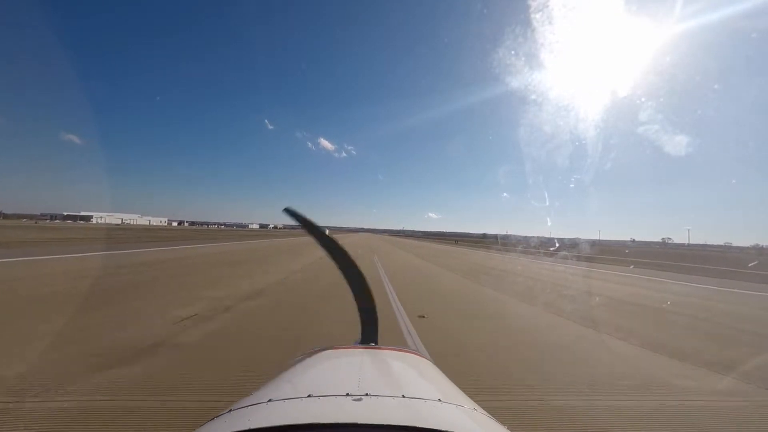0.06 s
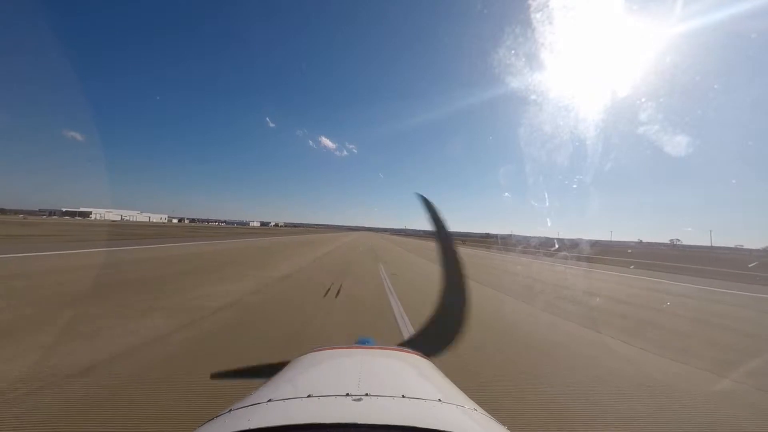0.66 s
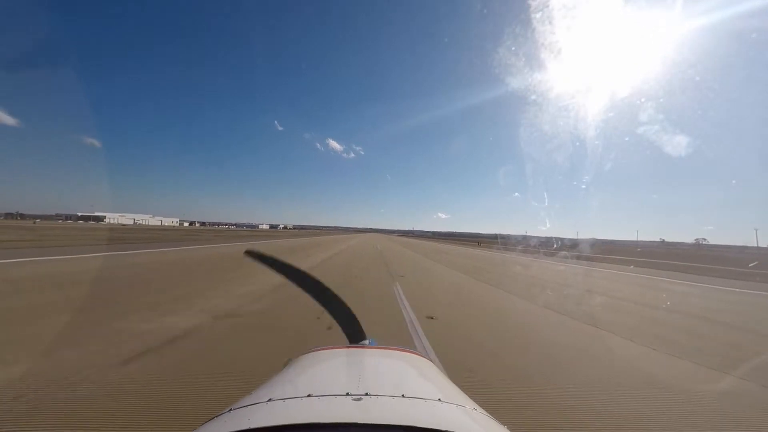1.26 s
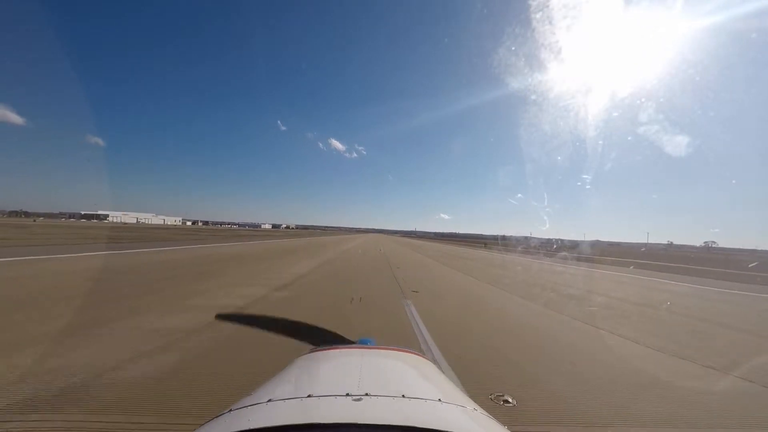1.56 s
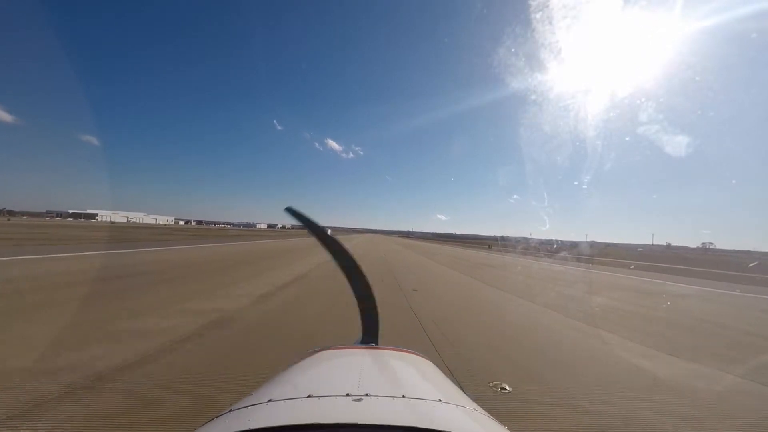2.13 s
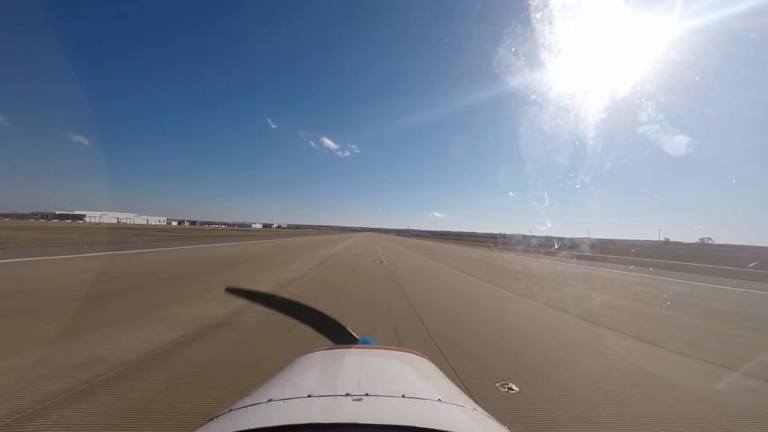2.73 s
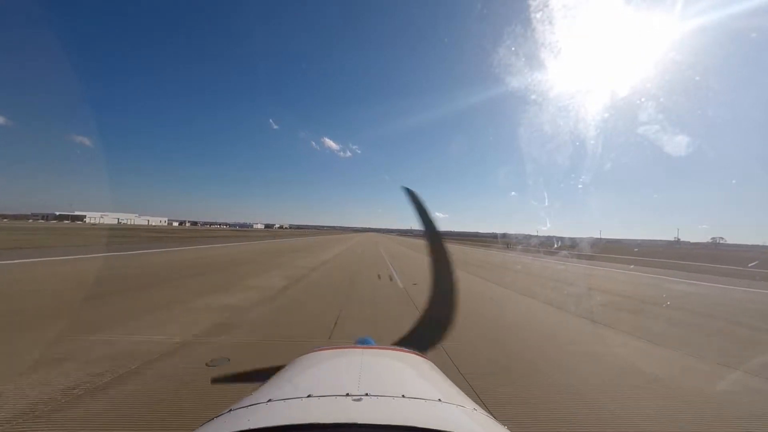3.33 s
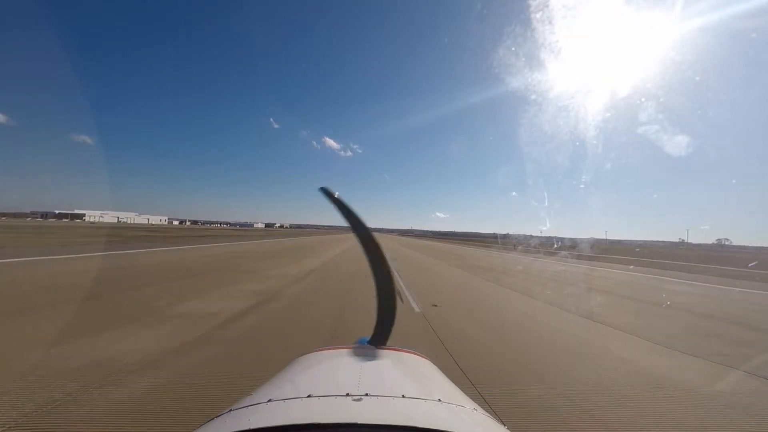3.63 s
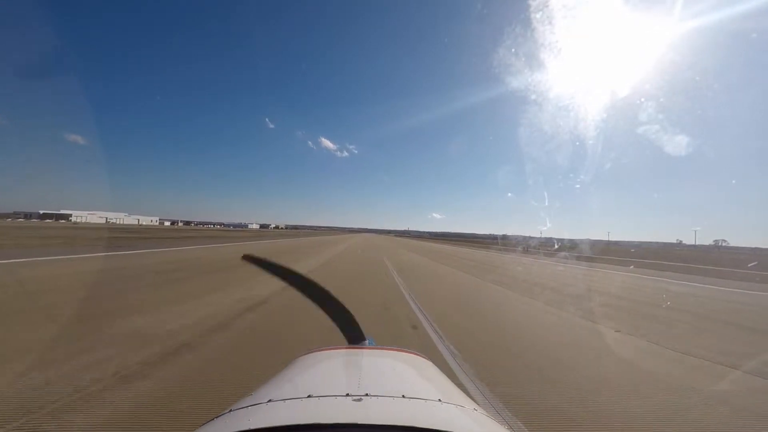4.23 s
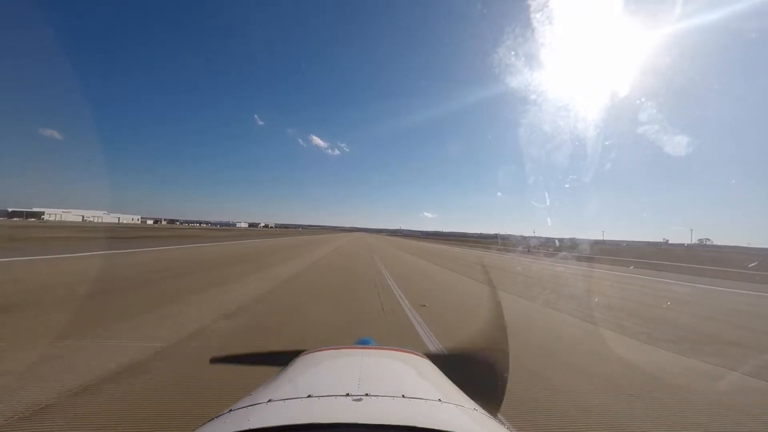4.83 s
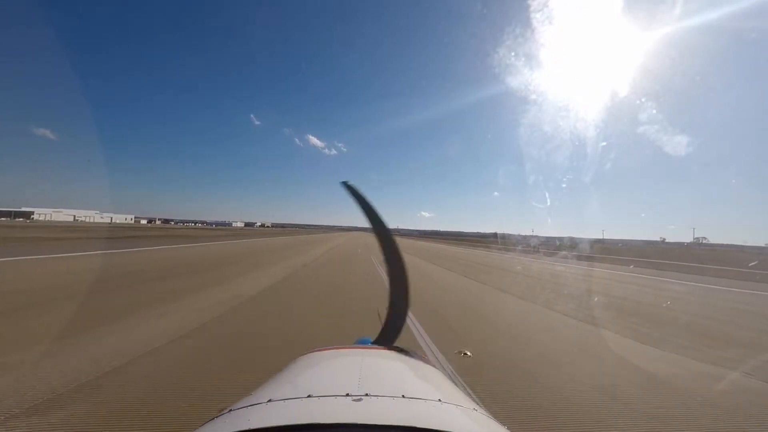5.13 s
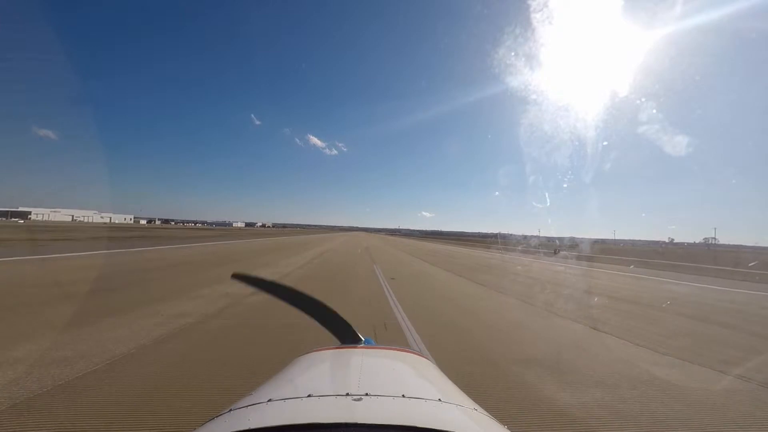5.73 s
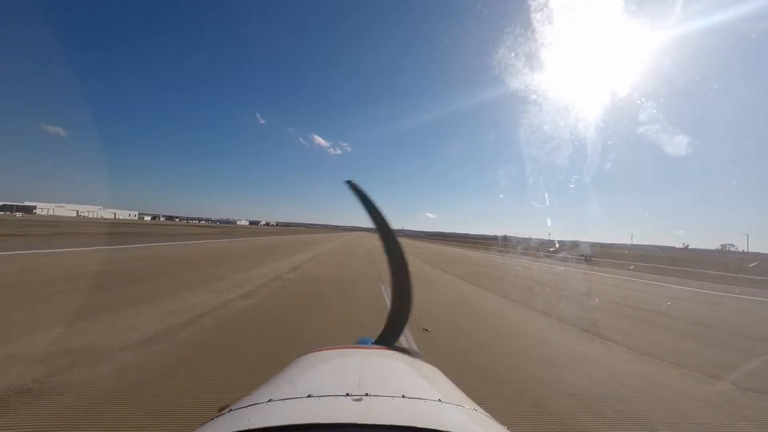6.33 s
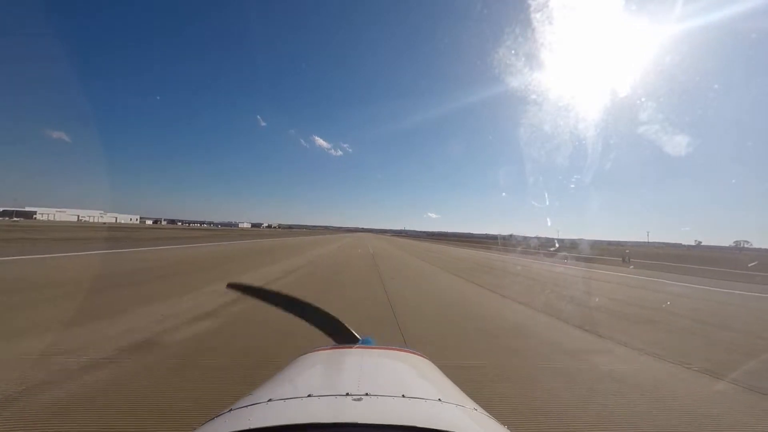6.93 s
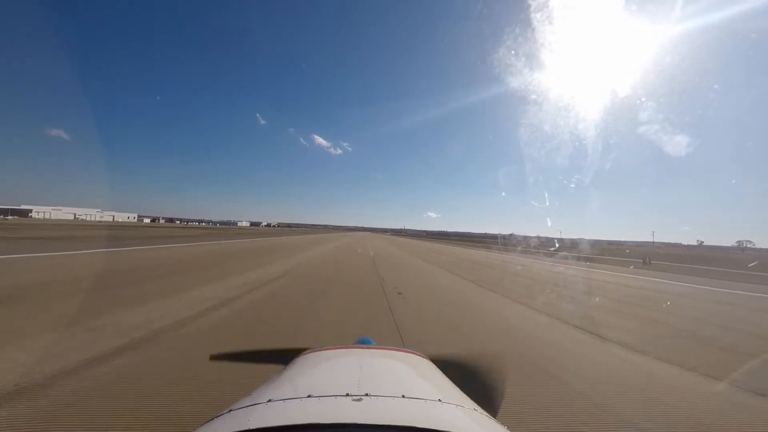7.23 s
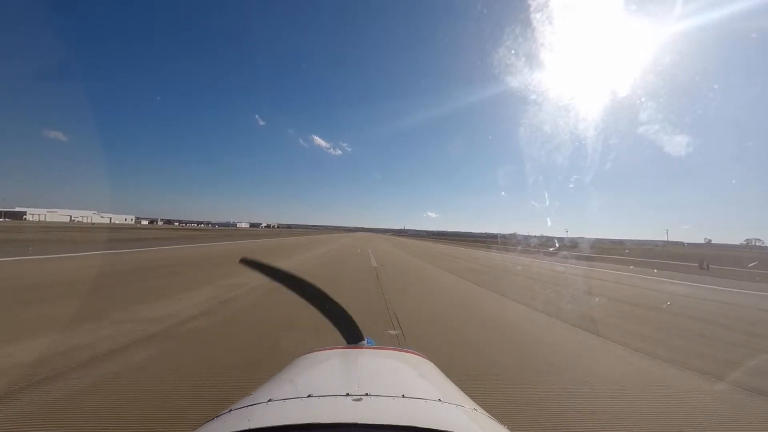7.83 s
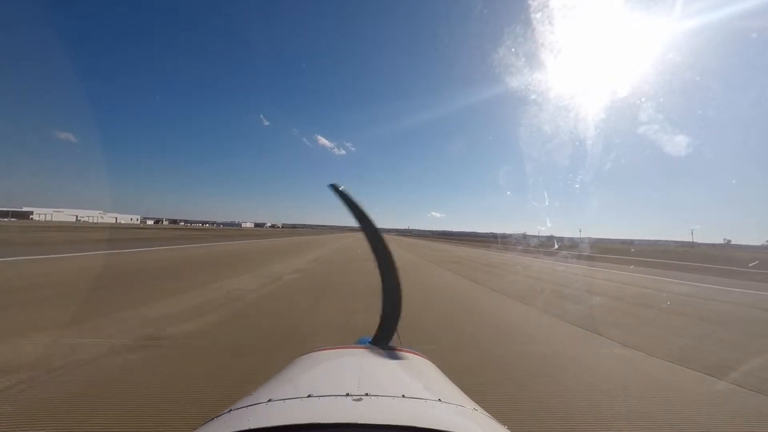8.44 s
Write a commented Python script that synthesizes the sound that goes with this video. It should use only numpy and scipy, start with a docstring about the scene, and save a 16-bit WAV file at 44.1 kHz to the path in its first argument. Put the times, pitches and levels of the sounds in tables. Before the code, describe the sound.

A light aircraft's piston engine and propeller throb steadily at low power, heard inside the rattling cabin as it rolls along a runway.

```python
"""Light aircraft taxiing, heard in the cabin.

A six-cylinder engine at fast idle throbs against the propeller beat; its valve gear clatters in a
pattern repeating nine times a second. The tyres drone through the airframe and thump over seams as
they slow. One wheel rubs once a turn, a loose panel buzzes, and something squeaks three times."""
import sys
import numpy as np
from scipy import signal
from scipy.fft import rfft, irfft
from scipy.io import wavfile
from scipy.ndimage import uniform_filter1d, minimum_filter1d, map_coordinates

SR = 44100
rng = np.random.default_rng(int(sys.argv[2]) if len(sys.argv) > 2 else 0)


def master_out(mix):
    """Clip the mix to full scale and print it as 16-bit PCM to the path in sys.argv[1]."""
    frames = np.transpose(np.atleast_2d(mix))
    ceiling = np.clip(frames, -1, 1)
    pcm = np.round(ceiling * 32767).astype(np.int16)
    wavfile.write(sys.argv[1], SR, pcm)


N = 373968
TIME = np.arange(N) / SR
HZ = np.fft.rfftfreq(N, 1 / SR)


def propeller(cycle, unevenness=.1):
    """Two blades, two turns a cycle: each pass sends a suction pulse over the windscreen."""
    # blade-pass harmonics: order, rms_db
    orders = [(1, -19.8), (2, -27), (3, -32.5)]
    passes = 4 * (cycle - .594)
    pulses = -sum(np.sqrt(2) * gain_of(db) * np.cos(2 * np.pi * k * passes) for k, db in orders)
    return (1 + unevenness * wander(16)) * pulses


def exhaust_throb(cycle, unevenness=.09):
    """Two banks of three cylinders fire in turn, no two firings alike."""
    # cycle-rate harmonics: order, rms_db
    orders = [(3, -20.3), (6, -24), (7, -42), (9, -37), (11, -42), (17, -45), (18, -45)]
    out = np.zeros(N)
    for k, db in orders:
        lag = rng.random() * (k > 6)  # the cabin scatters the higher orders' timing
        amplitude = np.sqrt(2) * gain_of(db) * (1 + unevenness * wander(14))
        out -= amplitude * np.cos(2 * np.pi * (k * (cycle - .552) + lag))
    return out


def valve_gear(cycle, scatter_db=1.55, jitter_s=.00033, detune=.022, cover_hz=936, cover_db=-17):
    """Millisecond knocks, each leaving a cover ring; at times the loudest all but fails."""
    # knocks: cycle_fraction, ring_hz, level_db, rise_s
    knocks = [(.012, 1288, -31, .0025), (.068, 1284, -39, .0023), (.153, 1175, -33, 0.0023),
              (.196, 1236, -29.5, .0025), (.296, 1260, -31.5, 0.0028), (.35, 1301, -34, .0026),
              (.512, 1169, -25.5, 0.0036), (.567, 1185, -30.5, 0.0031), (.575, 918, -33, .003),
              (.688, 1175, -31.5, 0.0014), (.787, 984, -39.5, 0.0027), (.845, 1170, -46, .003),
              (.955, 1306, -38, .003)]
    # knock strength: time_s, gain_db
    strength = [(0, -5), (1.8, -1.5), (3, -2.2), (3.8, -2.5), (4.6, -.5), (5.3, -0.5), (6.2, -0.5),
                (8.48, -0.5)]
    # weak knocks: time_s
    weak_s = [3.74, 5.74, 6.52]
    out, t = np.zeros(N), TIME[:SR // 25]
    for place, hz, db, rise_s in knocks:
        times = cycle_times(cycle, place)
        weak = abs(times[:, None] - weak_s).min(1) < .012
        force_db = np.interp(times, TIME, curve(strength) + .6 * wander(.8)) - 9 * weak
        cover_envelope = gain_of(cover_db) * np.minimum(t / rise_s, 1) * np.exp(-t / .018)
        cover = cover_envelope * np.sin(2 * np.pi * cover_hz * t)
        for s, hit_db, (late, size, sharp) in zip(times, force_db, rng.standard_normal((100, 3))):
            ring = pulse(t, rise_s) * np.sin(2 * np.pi * hz * (1 + detune * sharp) * t) + cover
            add(out, s + jitter_s * late, gain_of(db + hit_db + scatter_db * size) * ring)
    return out


def cowling_chugs(cycle, scatter_db=2, detune=.03, growth_db_per_s=.03):
    """Puffs of air and exhaust ring the cowling with a short hollow note."""
    # puffs: cycle_fraction, ring_hz, level_db, rise_s
    puffs = [(.062, 452, -28.5, .004), (.322, 422, -27, .0042), (.58, 477, -38.5, 0.0026),
             (0.684, 464, -34.5, 0.0038), (.822, 379, -30.5, 0.0035)]
    out, t = np.zeros(N), TIME[:SR // 25]
    for place, hz, db, rise_s in puffs:
        for s, (size, sharp) in zip(cycle_times(cycle, place), rng.standard_normal((100, 2))):
            ring = pulse(t, rise_s) * np.sin(2 * np.pi * hz * (1 + detune * sharp) * t)
            add(out, s, gain_of(db + growth_db_per_s * s + scatter_db * size) * ring)
    return out


def propeller_wash(cycle, level_db=-28.5, gust_db=.52):
    """Exhaust, turbulent air and tyre roar, pulsing with each blade."""
    # wash spectrum: freq_hz, density_db
    spectrum = [(100, -31.5), (180, -1.5), (260, -1), (310, .5), (370, -2), (460, 0.5), (550, -9.5),
                (680, -14), (1000, -16.8), (1340, -21.5), (1500, -33), (2200, -67.5)]
    air = cyclic_noise(cycle, share=.09) * swell(4 * cycle, place=.42, depth_db=1.4)
    gusts = gain_of(gust_db * wander(25))
    return runway_gain(level_db, db_per_db=1.4) * in_cabin(air * gusts, spectrum)


def runway_rumble(level_db=-20.5):
    """Runway grain, carried through the landing gear."""
    # rumble spectrum: freq_hz, density_db
    spectrum = [(6, -40), (16, -12.5), (24, 0), (34, -0.5), (42, -4), (50, -6.5), (67, 4.5), (78, -3.5),
                (100, -3.5), (120, -2.5), (145, -10.5), (175, -18.5), (260, -50.5)]
    return runway_gain(level_db, db_per_db=3) * in_cabin(rng.standard_normal(N), spectrum)


def tyre_drone(wheel, nose, unevenness=.2, slip_turns=.031):
    """Out-of-round tyres shake the airframe; orders waver, and swell near the fuselage boom."""
    # main-wheel harmonics: order, level_db
    main_orders = [(4, -29.5), (5, -28.5), (6, -35.5), (9, -36.5), (10, -34.5), (11, -36), (12, -48.5),
                   (13, -42.5)]
    # nose-wheel harmonics: order, level_db
    nose_orders = [(2, -38.5), (3, -29), (6, -39)]
    out = np.zeros(N)
    for turns, orders in (wheel, main_orders), (nose, nose_orders):
        rate_hz = np.gradient(turns) * SR
        for k, db in orders:
            boom_db = resonance_db(k * rate_hz, centre_hz=122, width_hz=14, lift_db=11)
            amplitude = np.sqrt(2) * gain_of(db + boom_db) * (1 + unevenness * wander(5.3))
            out += amplitude * np.cos(2 * np.pi * (k * turns + slip_turns * wander(3.4) + rng.random()))
    return out


def seam_thumps():
    """Runway seams thump the landing gear and hollow fuselage."""
    # seams: start_s, level_db, rise_s
    seams = [(0.187, -26, 0.0076), (2.547, -21, 0.0035), (2.678, -21.5, 0.01), (2.818, -21.5, 0.009),
             (3.099, -23, .011), (3.238, -27, 0.01), (3.878, -25, 0.0036), (4.627, -22, 0.0079),
             (7.478, -33, .007), (7.7, -22.5, 0.0077), (8.038, -24.5, 0.0062), (8.111, -28, 0.0046),
             (8.271, -21, 0.0081)]
    # thump spectrum: freq_hz, density_db
    spectrum = [(120, -24), (220, 0.5), (330, 1.5), (470, -3.5), (600, -8.5), (900, -33.5)]
    envelope, t = np.zeros(N), TIME[:SR // 8]
    for s, db, rise_s in seams:
        add(envelope, s, gain_of(db) * t / rise_s * np.exp(1 - t / rise_s))
    return envelope * in_cabin(rng.standard_normal(N), spectrum)


def tread_hum(trim_db=-1, unevenness=.3, slip_cycles=.056):
    """The tread sings one wavering note, sinking as the wheels slow."""
    # tread note: time_s, pitch_hz, level_db
    note = [(0, 316.5, -41.5), (.9, 318, -40.5), (1.4, 312.5, -38), (2.1, 305.6, -45), (2.8, 307.3, -40),
            (3.4, 306.5, -34.5), (4.2, 310.4, -36.5), (5, 301.8, -43), (5.8, 299.4, -42), (6.4, 293.5, -39),
            (7.1, 294, -39), (7.6, 291.4, -33), (8.48, 285.7, -33.5)]
    cycles = np.cumsum(curve(note)) / SR + slip_cycles * wander(5)
    amplitude = np.sqrt(2) * gain_of(trim_db + curve(note, column=2)) * (1 + unevenness * wander(3.5))
    return amplitude * np.cos(2 * np.pi * cycles)


def engine_hiss(cycle, level_db=-44.5):
    """Mechanical hiss, shaken by the engine's lurch."""
    # hiss spectrum: freq_hz, density_db
    spectrum = [(900, -15.5), (1500, -7), (1800, -3), (2200, 0.5), (2380, -6), (2750, -1.5), (3200, -12.5),
                (3700, -8.5), (4800, -14), (6000, -14.5), (7000, -21), (10500, -30), (15000, -32)]
    shaken = cyclic_noise(cycle, share=.2) * swell(3 * cycle, place=.7, depth_db=.6)
    return runway_gain(level_db, db_per_db=.3) * in_cabin(shaken, spectrum)


def panel_buzz(cycle, nose, level_db=-50, looseness_db=1):
    """A loose panel buzzes with each nose-wheel turn and two engine jolts a cycle."""
    # buzz spectrum: freq_hz, density_db
    spectrum = [(1500, -10), (2100, -8.5), (2380, -21), (2580, 2.5), (2780, -7.5), (2950, -4.5),
                (3200, -30.5)]
    # hard rattles: start_s, level_db
    rattles = [(.231, -38), (.525, -40), (.61, -43), (.683, -43), (1.073, -39.5), (1.476, -37),
               (1.526, -37.5), (1.572, -39), (2.739, -39), (3.395, -38), (5.069, -38), (5.47, -42),
               (6.738, -37), (6.848, -41.5)]
    jolts = stroke(cycle, place=.18, rise=.04, scatter_db=2) ** 2
    jolts += stroke(cycle, place=.49, rise=.07, scatter_db=2) ** 2
    turning = stroke(nose, place=.5, rise=.24, scatter_db=.8) ** 2
    shake = np.sqrt(turning ** 2 + .3 * jolts) * gain_of(looseness_db * wander(3.2))
    envelope = np.maximum(gain_of(level_db) * unit_rms(shake), flares(rattles, rise_s=.009))
    return envelope * in_cabin(cyclic_noise(cycle, share=.15), spectrum)


def wheel_rub(nose):
    """A high spot scrapes once a turn over a light drag, at times catching hard."""
    # rub spectrum: freq_hz, density_db
    spectrum = [(3000, -34.5), (3650, -4.5), (4050, 0.5), (4480, -2.5), (4850, -11), (7000, -40)]
    # rub strength: time_s, level_db
    drag = [(0, -56.5), (.5, -58.5), (.7, -61), (.95, -57), (1.2, -64), (1.45, -56), (2.1, -60.5),
            (3.3, -62), (3.7, -68), (4.6, -59), (6, -64.5), (8.48, -63)]
    # hard catches: start_s, level_db
    catches = [(.177, -55), (.331, -48), (.428, -55), (.587, -48), (.632, -51), (.682, -51), (.723, -54),
               (.826, -49), (.885, -48), (1.029, -52), (1.377, -51), (1.482, -52), (1.525, -54),
               (1.83, -50), (2.142, -49), (2.289, -48), (2.64, -50), (2.84, -50), (2.95, -52), (3.138, -50),
               (3.253, -48), (3.555, -52), (3.756, -53), (3.956, -51), (4.466, -51), (5.581, -53),
               (7.374, -51)]
    high_spot = stroke(nose, place=.6, rise=.27, scatter_db=.8) ** 2
    scrape = gain_of(curve(drag)) * unit_rms(.06 + high_spot)
    return np.hypot(scrape, flares(catches, rise_s=.013)) * in_cabin(rng.standard_normal(N), spectrum)


def squeaks(arch=.01, waver=.007, echo_s=.01, echo_db=-10):
    """Three stutters of raspy stick-slip chirps, arching in pitch and level."""
    # chirps: start_s, length_s, pitch_hz, level_db, climb_fraction, octave_db
    chirps = [(1.746, .045, 5640, -52.5, .015, -30), (1.81, .03, 5550, -55, 0, -32),
              (3.72, 0.044, 5530, -55, -.02, -28), (3.76, 0.038, 5670, -52, .025, -28),
              (3.803, .042, 5640, -50, -0.0039, -30), (3.838, .03, 5820, -54, .04, -32),
              (8.266, .02, 5640, -50, .01, -25), (8.307, .02, 5680, -45.5, .005, -16),
              (8.344, .014, 5730, -50, .005, -3), (8.38, .018, 5770, -53, .015, -20),
              (8.425, 0.025, 5500, -49, 0, -35)]
    out, drift = np.zeros(N), wander(500)
    for s, length_s, hz, db, climb, octave_db in chirps:
        during = (TIME >= s) & (TIME < s + length_s)
        progress = (TIME[during] - s) / length_s
        effort = np.sin(np.pi * progress)
        pitch_hz = hz * (1 + climb * (progress - .5) + arch * (effort - 1) + waver * drift[during])
        phase = 2 * np.pi * np.cumsum(pitch_hz) / SR
        tone = np.sin(phase) + gain_of(octave_db) * effort * np.sin(2 * phase)
        add(out, s, gain_of(db) * np.sqrt(effort) * tone)
    echo = rng.standard_normal(SR // 10) * np.exp(-TIME[:SR // 10] / echo_s)
    return out + gain_of(echo_db) * signal.oaconvolve(out, echo / np.linalg.norm(echo))[:N]


def trim_clacks(rise_s=.00058):
    """Something loose taps the cabin trim."""
    # taps: start_s, level_db, decay_s
    taps = [(2.809, -35, .003), (3.55, -39, .002), (8.222, -27, 0.0042), (8.336, -27.5, .0019),
            (8.411, -42, .002)]
    # tap spectrum: freq_hz, density_db
    spectrum = [(700, -23), (1500, 14), (2300, -1), (4000, -3), (7000, -20), (11000, -54)]
    envelope, t = np.zeros(N), TIME[:SR // 20]
    for s, db, decay_s in taps:
        add(envelope, s, gain_of(db) * np.minimum(t / rise_s, 1) * np.exp(-t / decay_s))
    return envelope * in_cabin(rng.standard_normal(N), spectrum)


def fitting_ticks(level_db=-71, rate_hz=40, clear_trim_db=-4, decay_s=.0027):
    """Shaken fittings tick faintly; a few ticks stand out."""
    # clear ticks: start_s, level_db
    clear_ticks = [(1.687, -49), (2.832, -49), (3.652, -55), (5.054, -49), (6.613, -49), (7.33, -51),
                   (8.351, -49), (8.375, -51)]
    # tick spectrum: freq_hz, density_db
    spectrum = [(1500, -11.5), (3500, -12.5), (7000, 5.5), (10000, -8), (14000, -18), (15200, -19)]
    sizes = gain_of(3 * np.minimum(rng.exponential(1, N), 3))
    impulses = sizes * (rng.random(N) < rate_hz / SR)
    decays = signal.lfilter([1], [1, -np.exp(-1 / (decay_s * SR))], impulses)
    envelope = gain_of(level_db) * unit_rms(decays)
    for s, db in clear_ticks:
        add(envelope, s, gain_of(db + clear_trim_db) * np.exp(-TIME[:SR // 50] / decay_s))
    return envelope * in_cabin(rng.standard_normal(N), spectrum)


def runway_gain(level_db, db_per_db):
    """Gain following the runway's roughness."""
    # surface roughness: time_s, level_db
    roughness = [(0, -0.5), (0.8, 0), (2.2, -1), (2.6, 0.8), (3.2, .5), (3.7, -0.5), (7.1, 0.26),
                 (7.8, 0.5), (8.48, 1)]
    return gain_of(level_db + db_per_db * curve(roughness))


def in_cabin(x, spectrum):
    """Shapes x by a spectrum and the cabin's resonances; rms 1."""
    # cabin and panel modes: centre_hz, width_hz, lift_db
    modes = [(232.4, 21, 3), (330, 11, -0.4), (768, 23, 3), (936.5, 34, 8.5), (1153, 49, 11.5),
             (1332, 47, 13), (1700, 140, 7.5), (1943, 30, 6), (2090, 21, 7.5), (2554, 54, 9),
             (2693, 53, 5.5), (3940, 36, 5.5), (4060, 52, 0), (4440, 21, 3.5), (5280, 82, 4.5)]
    freq_hz, density_db = np.transpose(spectrum)
    shape_db = np.interp(np.log(HZ + 1), np.log(freq_hz), density_db)
    shape_db += sum(resonance_db(HZ, *mode) for mode in modes)
    rolloff = np.minimum(1, freq_hz[-1] / (HZ + 1)) ** 2
    return unit_rms(irfft(rfft(x) * gain_of(shape_db) * rolloff, N))


def resonance_db(hz, centre_hz, width_hz, lift_db):
    return lift_db / (1 + (2 * (hz - centre_hz) / width_hz) ** 2)


def cyclic_noise(cycle, share):
    """Noise with a share of its power repeating each cycle: close-set harmonics."""
    length = round(N / cycle[-1])
    loop = map_coordinates(rng.standard_normal(length), [cycle % 1 * length], order=1, mode="grid-wrap")
    return np.sqrt(share) * unit_rms(loop) + np.sqrt(1 - share) * rng.standard_normal(N)


def cycle_times(cycle, place):
    """Times (s) at which each cycle reaches the fraction `place`."""
    return np.interp(np.arange(place, cycle[-1], 1), cycle, TIME)


def swell(turns, place, depth_db):
    """Gain peaking once a turn."""
    return gain_of(depth_db * np.cos(2 * np.pi * (turns - place)))


def stroke(turns, place, rise, scatter_db):
    """Quick rise and slower fall once a turn, of random strength; place and rise in turns."""
    count, part = np.divmod(turns - place + 2, 1)
    size = gain_of(scatter_db * rng.standard_normal(400))[count.astype(int)]
    return size * part / rise * np.exp(1 - part / rise)


def pulse(t, rise_s):
    """Smooth pulse peaking at 1 after rise_s."""
    return (t / rise_s * np.exp(1 - t / rise_s)) ** 2


def flares(rows, rise_s):
    """Envelope with one pulse per (start_s, level_db) row."""
    envelope = np.zeros(N)
    for s, db in rows:
        add(envelope, s, gain_of(db) * pulse(TIME[:SR // 12], rise_s))
    return envelope


def wander(rate_hz, step=32):
    """Random drift below rate_hz; rms 1."""
    count = N // step + 2
    lowpass = 1 / (1 + (np.fft.rfftfreq(count, step / SR) / rate_hz) ** 4)
    slow = irfft(rfft(rng.standard_normal(count)) * lowpass, count)
    return unit_rms(np.interp(np.arange(N) / step, np.arange(count), slow))


def curve(rows, column=1):
    rows = np.array(rows)
    return np.interp(TIME, rows[:, 0], rows[:, column])


def add(mix, start_s, sound):
    part = mix[max(round(start_s * SR), 0):][:len(sound)]
    part += sound[:len(part)]


def gain_of(db):
    return 10 ** (np.asarray(db) / 20)


def unit_rms(x):
    return x / np.sqrt(np.mean(x ** 2) + 1e-20)


def scene(wheel_hz=12.32, slowing_hz_per_s=.105):
    """Engine, wheels and cabin, summed to mono."""
    # four-stroke cycle rate: time_s, rate_hz
    engine_speed = [(0, 8.884), (0.8, 8.905), (2.1, 9.018), (4.5, 9.011), (5.9, 8.935), (7, 8.949),
                    (8.48, 8.834)]
    cycle = np.cumsum(curve(engine_speed)) / SR
    wheel = np.cumsum(wheel_hz - slowing_hz_per_s * TIME) / SR  # turns
    nose = 1.638 * wheel  # the smaller wheel turns faster
    engine = exhaust_throb(cycle) + propeller(cycle) + valve_gear(cycle) + cowling_chugs(cycle)
    rush = propeller_wash(cycle) + engine_hiss(cycle)
    rolling = tyre_drone(wheel, nose) + runway_rumble() + seam_thumps()
    friction = wheel_rub(nose) + squeaks()
    cabin = tread_hum() + panel_buzz(cycle, nose) + trim_clacks() + fitting_ticks()
    return (engine + rush + rolling + friction + cabin)[None]


def record(dry, hold_s=.023, ceiling_db=-3.3, fade_in_s=.004, cutoff_hz=15400):
    """Fast limiter, fade-in and low-pass."""
    hold = round(hold_s * SR)
    allowed = np.minimum(1, gain_of(ceiling_db) / (abs(dry) + 1e-9))
    limited = dry * uniform_filter1d(minimum_filter1d(allowed, hold), hold)
    fade_in = np.minimum(TIME / fade_in_s, 1)
    lowpass = signal.firwin(511, cutoff_hz, window=("kaiser", 9), fs=SR)
    return signal.oaconvolve(limited * fade_in, lowpass[None], "same")


dry = scene()
out = record(dry)
master_out(out)
```